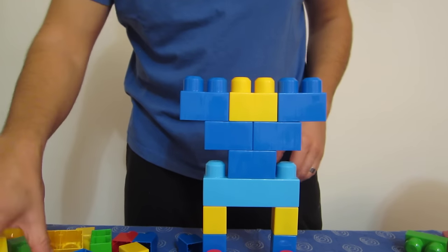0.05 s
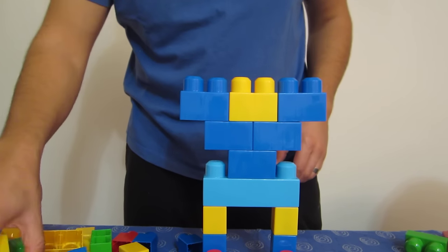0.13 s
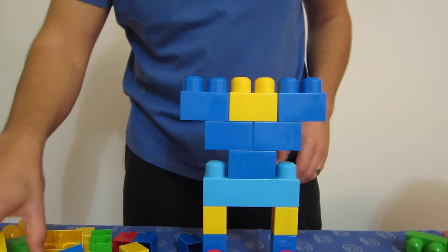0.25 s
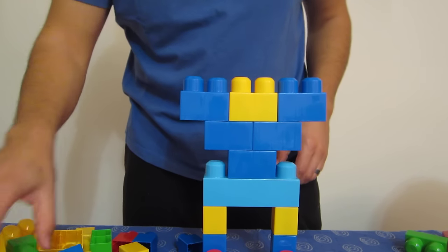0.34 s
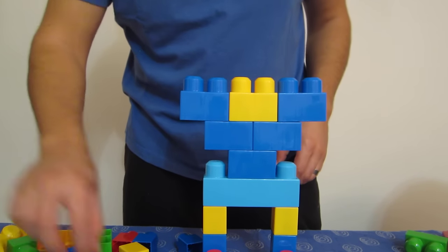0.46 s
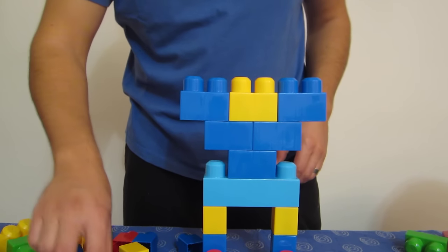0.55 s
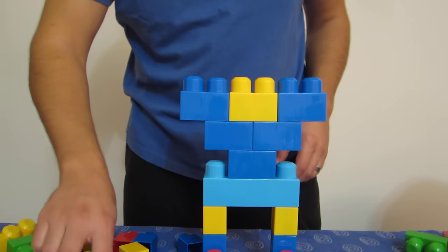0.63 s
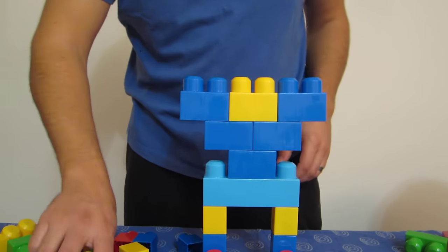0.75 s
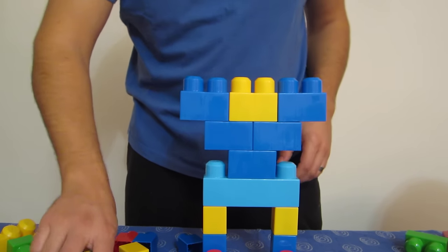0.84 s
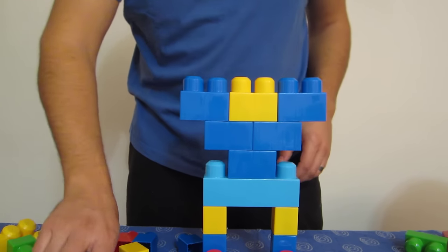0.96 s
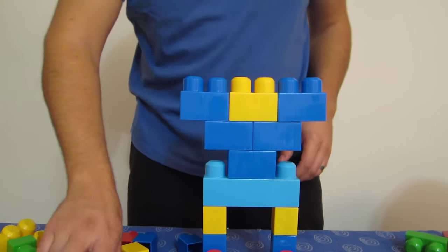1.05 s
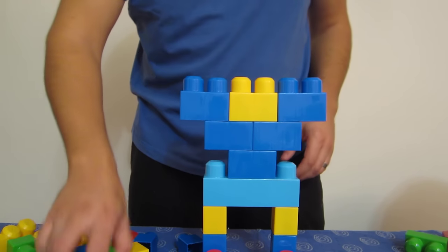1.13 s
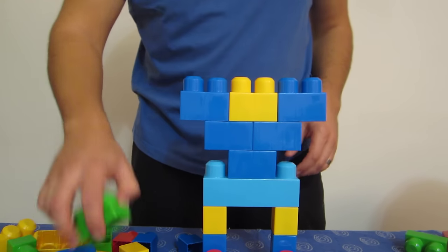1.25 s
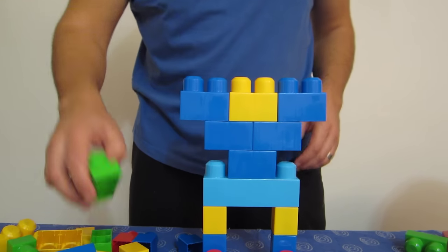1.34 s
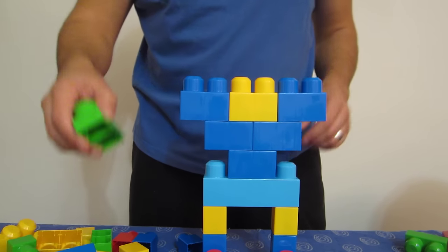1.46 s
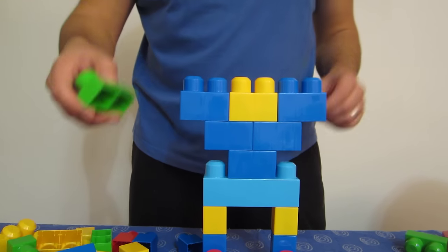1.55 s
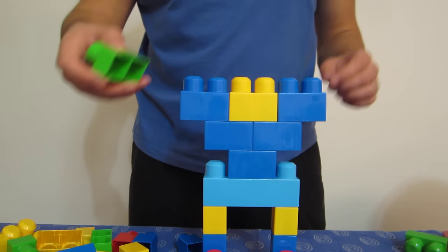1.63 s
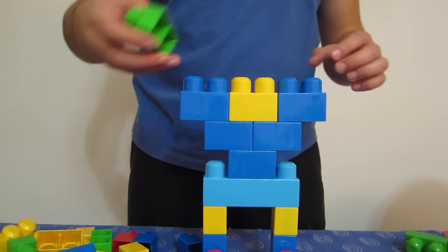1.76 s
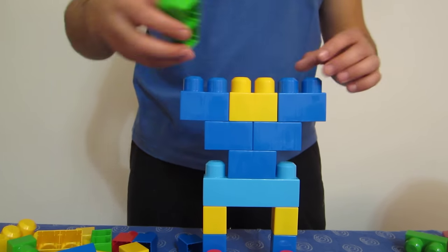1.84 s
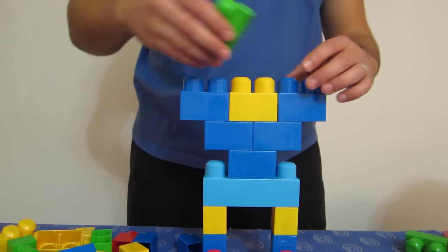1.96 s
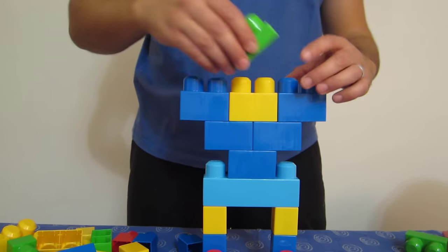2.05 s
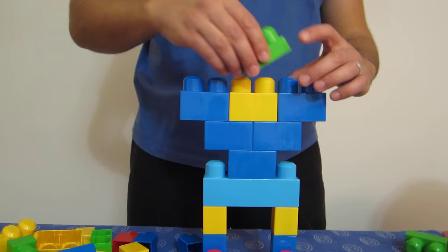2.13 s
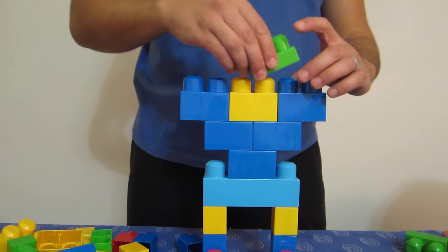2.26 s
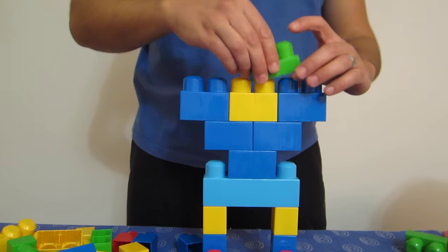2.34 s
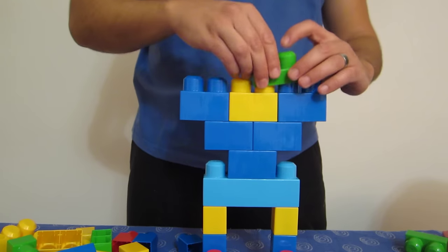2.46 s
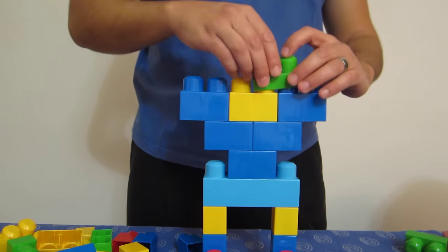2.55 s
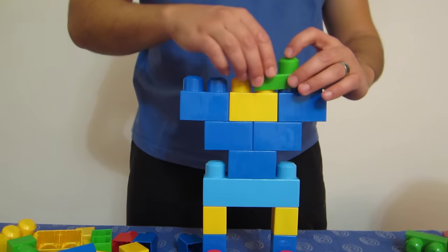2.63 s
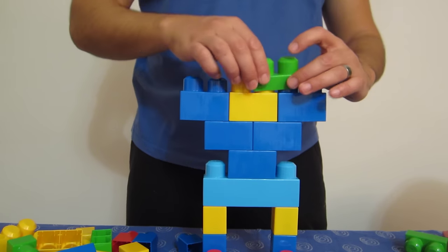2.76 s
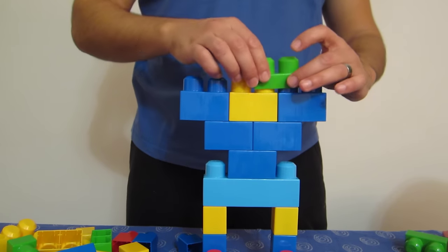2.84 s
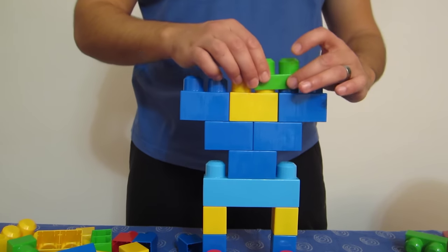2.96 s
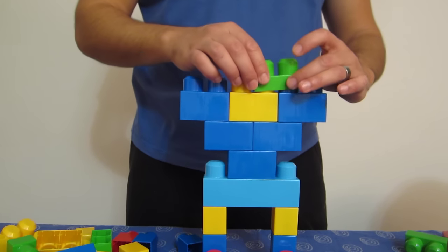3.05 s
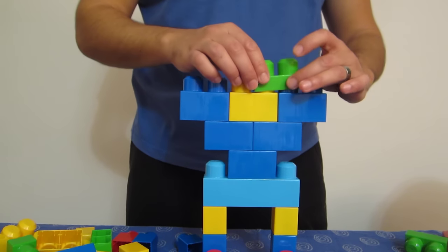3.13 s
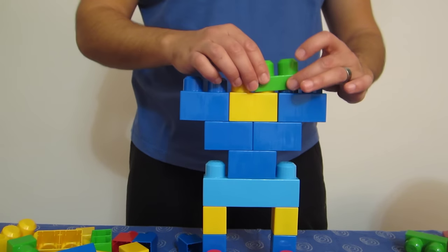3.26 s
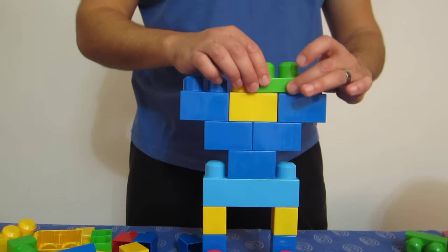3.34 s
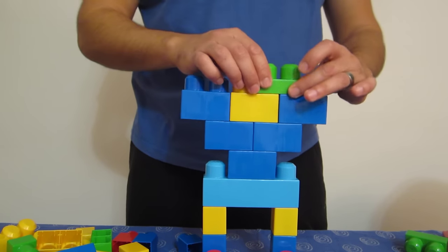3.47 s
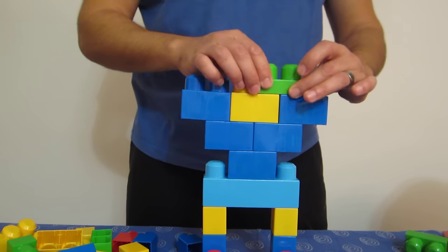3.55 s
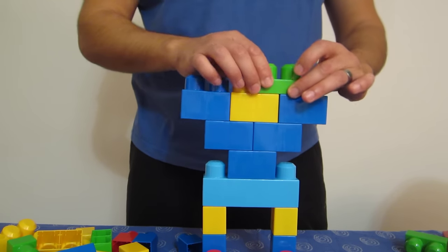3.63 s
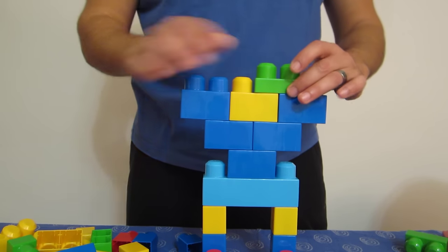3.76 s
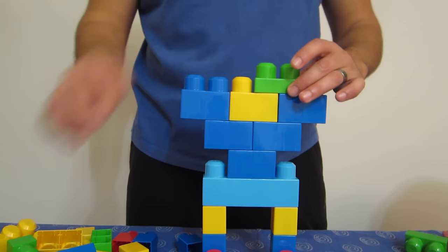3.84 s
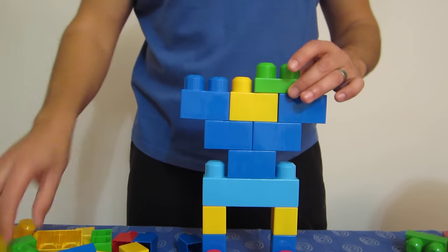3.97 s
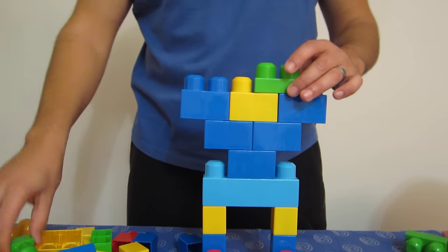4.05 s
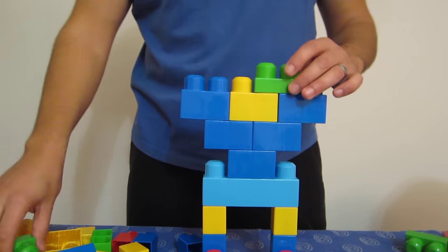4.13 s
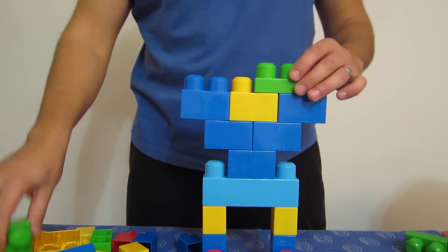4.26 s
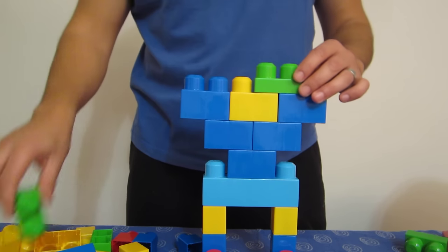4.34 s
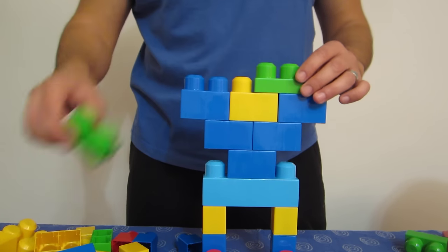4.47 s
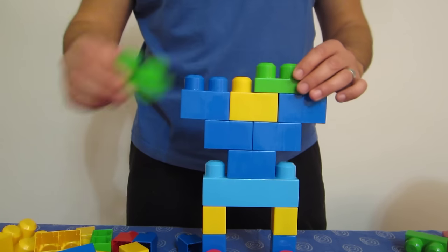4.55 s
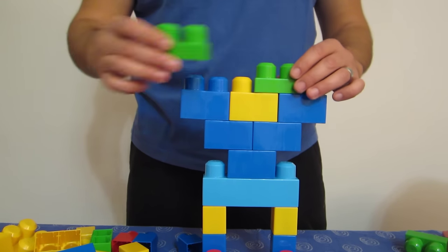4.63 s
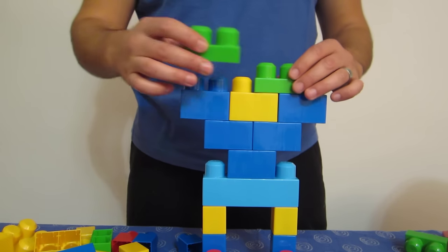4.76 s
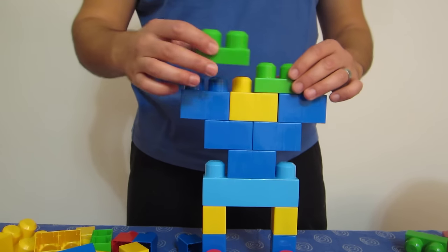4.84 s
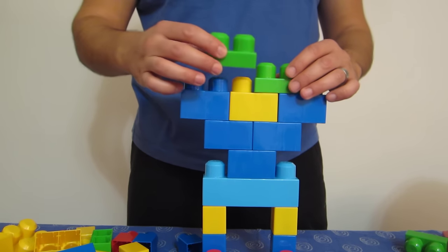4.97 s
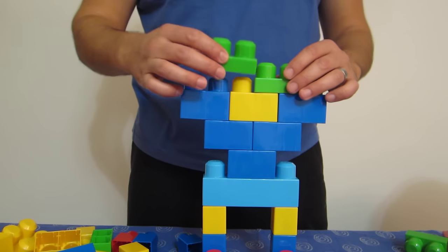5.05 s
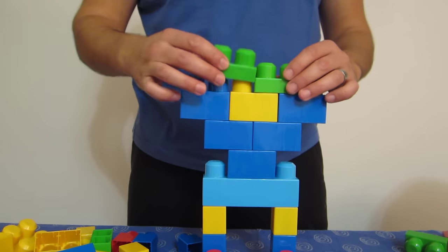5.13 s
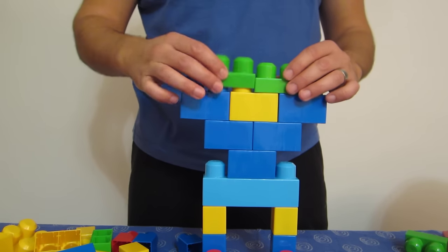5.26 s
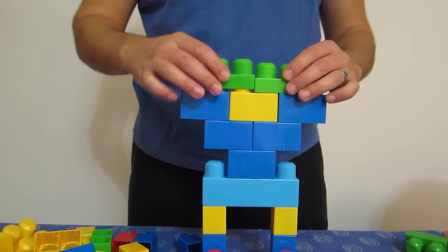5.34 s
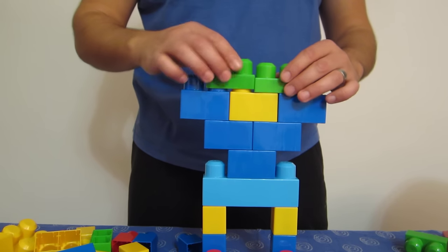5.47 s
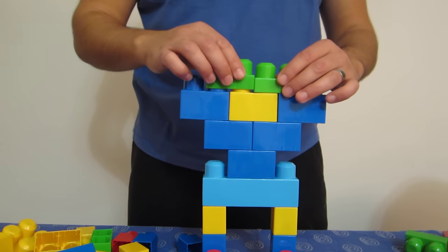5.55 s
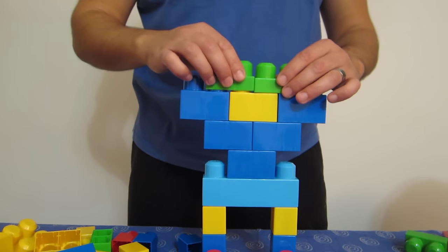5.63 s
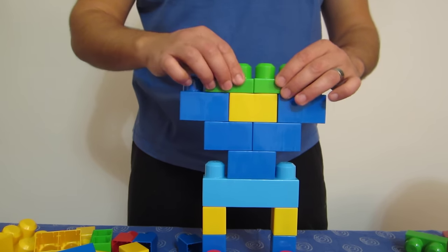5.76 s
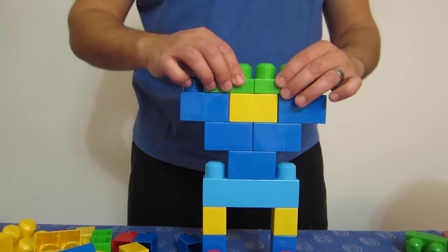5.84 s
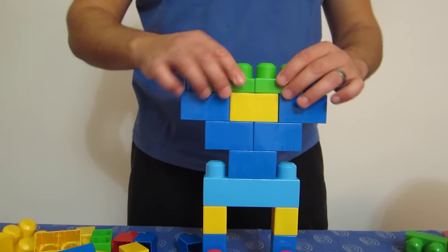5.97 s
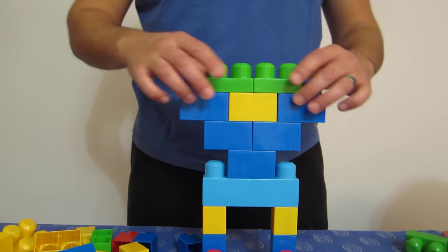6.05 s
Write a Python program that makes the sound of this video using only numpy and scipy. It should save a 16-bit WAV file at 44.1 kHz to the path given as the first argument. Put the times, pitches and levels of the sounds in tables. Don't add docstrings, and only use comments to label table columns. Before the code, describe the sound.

Close in a small indoor room, large hollow plastic blocks clatter and scrape as a hand searches a pile on a table. The rummaging fades after a second, with faint skin rubs. One block knocks sharply onto a stack and settles with tiny clicks. A shorter, lighter rummage follows, then a second block snaps on. Faint hum and microphone hiss continue underneath.

```python
import sys
import numpy as np
from scipy import signal
from scipy.fft import rfft, irfft
from scipy.io import wavfile
from scipy.ndimage import uniform_filter1d

SR = 44100
rng = np.random.default_rng(int(sys.argv[2]) if len(sys.argv) > 2 else 0)


def amplitude_ratio(level_db):
    exponent = np.asarray(level_db, float) / 20
    return 10 ** exponent


def to_wav(s):
    ch = np.atleast_2d(s).T
    pcm = np.round(np.clip(ch, -1, 1) * 32767)
    wavfile.write(sys.argv[1], SR, pcm.astype(np.int16))


N = 269010

# frequency in Hz, density in dB per Hz.
AIR_SPECTRUM = [(12, -19), (20, 1.5), (53, -3), (174, -2.5), (205, -8), (264, -5.5), (304, -8.5), (403, -9),
                (438, -12), (533, -11.5), (1050, -16.5), (1200, -14), (2110, -20.5), (7890, -25),
                (16400, -33.5)]
# frequency in Hz, width in Hz, level in dB.
HUM_LINES = [(183.5, 13, -70), (1186, 42, -72), (7840, 66, -79.5), (13100, 40, -113)]
# frequency in Hz, decay time t60 in seconds, level in dB.
ROOM_BANDS = [(358, 0.4, -24), (900, 0.38, -23), (2000, 0.21, -20.5), (3970, 0.46, -24.5),
              (8600, 0.25, -21), (12600, 0.096, -15)]
# frequency in Hz, level in dB, decay time t60 in seconds.
TABLE_MODES = [(83, 1.5, 0.1), (118.9, 0.5, 0.31), (164, -10, 0.31), (291, 5, 0.048)]
# start in seconds, peak level in dB.
TABLE_BLOWS = [(0.023, -36.5), (0.148, -49), (0.317, -39), (0.607, -24.5), (0.645, -23.5), (0.759, -35.5),
               (0.995, -42), (4.065, -39), (4.168, -49), (4.337, -40), (5.297, -44), (5.899, -39),
               (5.931, -35.5), (5.951, -41)]
# frequency in Hz, width in Hz, level in dB.
SKIN_RESONANCES = [(2210, 450, 6), (5900, 3000, -2.5), (7300, 2600, -2), (9600, 640, 4), (10750, 1700, -3)]
# loudest moment in seconds, level in dB, length in seconds.
FINGER_RUBS = [(1.315, -56, 0.15), (1.515, -57, 0.081), (1.58, -56.5, 0.15), (1.74, -63, 0.082),
               (1.795, -56, 0.067), (1.87, -64, 0.13), (2.37, -59, .1), (2.746, -61, .1), (3.686, -65, .2),
               (4.075, -52, 0.045), (4.12, -56, 0.16), (4.52, -57.5, 0.079), (4.605, -65, 0.12),
               (5.565, -60, .06), (5.64, -63, 0.075), (5.95, -57, 0.057), (6.0, -61, .08)]
# frequency in Hz, level in dB.
BLOCK_MODES = [(340, -22), (470, -11.5), (600, -8.5), (700, -4.5), (830, -6), (1050, -4.5), (1280, -3),
               (1450, -1.5), (1650, -5.5), (2000, 1.5), (2300, -9.5), (2700, -10), (3050, -7.5),
               (3500, -7.5), (4200, -5), (4800, -18), (5400, -9), (6100, -7)]
# frequency in Hz, width in Hz, level in dB.
EDGE_RESONANCES = [(7120, 1300, 14), (8760, 1900, 6), (12200, 1900, -1)]
# loudest moment in seconds, level in dB, length in seconds.
PILE_SCRAPES = [(.05, -41, 0.29), (.17, -49, 0.22), (.34, -33.5, 0.082), (.48, -54, .1), (.69, -36, 0.21),
                (.85, -52.5, 0.36), (1.03, -43.5, 0.21), (1.17, -61, 0.23), (2.47, -52.5, 0.17),
                (4.075, -45.5, 0.062), (4.2, -47, 0.28), (4.36, -43, .25), (4.47, -61, .15)]
# start in seconds, hollow note in Hz, hollow in dB, snap in dB.
END_WALL_KNOCKS = [(0.0002, 1140, -27.5, -41), (0.0196, 1230, -28, -51), (0.0266, 1163, -17, -21.5),
                   (0.0343, 1130, -36, -50), (0.3943, 1040, -29, -28), (0.4389, 670, -33, -48),
                   (0.5911, 960, -40, -36), (0.5971, 1150, -33, -44), (4.0917, 2170, -39, -36),
                   (4.1011, 1280, -41.5, -40), (4.1345, 1340, -40.5, -35), (2.4385, 1880, -27, -19.5),
                   (2.4461, 1920, -43, -44), (3.6304, 1480, -51, -49), (5.1772, 1790, -48, -25.5),
                   (6.0238, 1150, -51, -46)]
# start in seconds, hollow note in Hz, hollow in dB, snap in dB.
SIDE_WALL_KNOCKS = [(0.6354, 1600, -28, -57), (0.6471, 720, -20, -15.5), (0.6648, 1270, -21.5, -29),
                    (0.6971, 1230, -28.5, -30), (0.7385, 1260, -32, -21.5), (0.7595, 770, -20.5, -18.5),
                    (0.822, 1550, -22.5, -37), (0.8751, 700, -31.5, -45), (0.9481, 690, -32, -55),
                    (0.9982, 650, -22, -27), (1.0718, 640, -40, -57), (1.0775, 644, -35, -47),
                    (1.147, 1380, -36.5, -59), (0.1527, 2077, -17, -21.5), (0.2846, 1200, -31.5, -32),
                    (0.3235, 1077, -21, -15), (1.3143, 1270, -36, -50), (1.3737, 634, -40.5, -62),
                    (2.1544, 1310, -32.5, -42.5), (2.315, 1330, -46, -56), (2.708, 1270, -51.5, -44),
                    (2.927, 1310, -54, -62), (2.977, 1510, -52, -63), (3.366, 1310, -48.5, -58),
                    (3.849, 1440, -51, -58)]
# start in seconds, hollow note in Hz, hollow in dB, snap in dB.
LONG_WALL_KNOCKS = [(4.1736, 1860, -31, -31.5), (4.1781, 1980, -29, -46), (4.2413, 1220, -43, -55),
                    (1.1678, 1220, -32.5, -32.5), (0.1433, 740, -25.5, -25), (0.1486, 845, -24.5, -30),
                    (4.334, 620, -29.5, -31), (4.3392, 2480, -29, -19.5), (4.3662, 860, -31, -29.5),
                    (4.3846, 790, -41, -53), (4.4029, 660, -30, -31), (4.4402, 780, -37, -36),
                    (4.4447, 665, -38, -55), (4.4585, 825, -37, -57), (4.6359, 810, -39.5, -48),
                    (5.154, 1307, -27.5, -20), (5.3067, 1210, -37.5, -36.5), (5.434, 2000, -51, -55)]
# start in seconds, hollow note in Hz, hollow in dB, snap in dB.
FACE_MEETINGS = [(0.276, 750, -27.5, -30), (0.4451, 720, -32, -33), (0.5867, 1110, -47, -35),
                 (0.7552, 960, -23.5, -24), (0.9217, 756, -31.5, -42), (1.0241, 2120, -37, -33.5),
                 (2.1548, 1900, -41, -48), (2.439, 645, -35, -47), (4.2603, 2130, -34.5, -34.5),
                 (4.2957, 2250, -35, -31), (4.3039, 2240, -39, -42), (4.3273, 1210, -40, -41),
                 (4.3566, 670, -28, -35), (4.6301, 880, -42.5, -45.5), (5.1835, 1350, -34, -50),
                 (5.7488, 1200, -47, -43)]
# start in seconds, hollow note in Hz, hollow in dB, snap in dB.
CORNER_KNOCKS = [(0.1188, 820, -29, -33.5), (0.1661, 627, -31, -31), (0.2562, 1300, -29, -34),
                 (0.6106, 1120, -20, -22.5), (0.659, 1230, -19.5, -17), (0.9172, 1080, -26, -35.5),
                 (4.0704, 2150, -39, -40), (4.2539, 2300, -34, -48), (4.2798, 696, -33.5, -38.5),
                 (4.3445, 2240, -27, -31.5), (5.1582, 1380, -29.5, -34), (5.4433, 1970, -48, -52),
                 (5.7388, 1380, -45, -47), (3.7134, 1250, -52, -53.5)]
# start in seconds, hollow note in Hz, hollow in dB, snap in dB.
RIM_GRAZES = [(0.0589, 1250, -28, -48), (0.2799, 1340, -40, -47), (0.6547, 820, -22, -37),
              (0.6881, 2430, -27, -41), (0.7481, 894, -18.5, -47), (0.813, 900, -27, -56),
              (0.889, 2280, -32, -60), (1.0097, 750, -28, -46), (1.7319, 2230, -50.5, -61.5),
              (2.4641, 1860, -48, -62), (4.0634, 2300, -43.5, -53), (4.0837, 2060, -40, -58),
              (4.1468, 2040, -39, -61), (4.5838, 2060, -57, -55), (5.9002, 1910, -46, -55.5)]
# start in seconds, hollow note in Hz, hollow in dB, snap in dB.
STUD_CATCHES = [(0.1829, 1420, -26, -29.5), (0.4025, 834, -53, -37), (2.5219, 1500, -42, -40),
                (2.5498, 1390, -44, -45), (2.579, 1250, -60, -41), (2.5944, 1910, -44.5, -47.5),
                (3.68, 1340, -47, -43), (3.877, 1880, -46.5, -52), (4.4135, 680, -44, -42),
                (5.1703, 1840, -56, -22), (5.2539, 1820, -35, -23), (5.287, 1400, -35.5, -50),
                (5.302, 2070, -38.5, -42), (5.931, 1570, -44, -40), (5.949, 1900, -42.5, -42.5),
                (6.009, 1560, -42.5, -42)]


def scale_rms(x, db):
    return x * amplitude_ratio(db) / np.sqrt(np.mean(x ** 2))


def scale_peak(x, db):
    return x * amplitude_ratio(db) / np.abs(x).max()


def resonance(x, hz, width):
    return signal.lfilter(*signal.iirpeak(hz, hz / width, SR), x)


def decay(t, t60):
    return np.exp(-np.log(1000) * t / t60)


def ring(hz, t60, t):
    return np.sin(2 * np.pi * hz * t) * decay(t, t60)


def onset(t, seconds):
    return 1 - np.exp(-t / seconds)


def add(out, s, sound):
    i = int(s * SR)
    out[i:i + len(sound)] += sound[:N - i]


def strokes(rows):
    rise_share, fade_db = 0.39, 19
    t, gain = np.arange(N) / SR, np.zeros(N)
    for s, db, length in rows:
        near = slice(max(int((s - 2 * length) * SR), 0), int((s + 2 * length) * SR))
        late = (t[near] - s) / length
        distance = np.where(late < 0, -late / rise_share, late / (1 - rise_share))
        gain[near] += amplitude_ratio(db - fade_db * distance)
    return gain


def air():
    hz, db = np.transpose(AIR_SPECTRUM)
    bin_hz = np.arange(N // 2 + 1) * SR / N
    colour = amplitude_ratio(np.interp(np.log(bin_hz + 1), np.log(hz), db))
    tone = scale_rms(irfft(rfft(rng.standard_normal(N)) * colour, N), -57.5)
    for hz, width, db in HUM_LINES:
        tone = tone + scale_rms(resonance(rng.standard_normal(N), hz, width), db)
    return tone


def room(x):
    gap_s, build_s = 0.0032, 0.00087
    t = np.arange(SR // 2) / SR
    tail = np.zeros(len(t))
    for hz, t60, db in ROOM_BANDS:
        part = resonance(rng.standard_normal(len(t)), hz, 0.77 * hz) * decay(t, t60)
        tail += amplitude_ratio(db + 5.5) * part / np.sqrt(np.sum(part ** 2))
    tail *= onset(np.maximum(t - gap_s, 0), build_s)
    return signal.fftconvolve(x, tail)[:N]


def table():
    t, out = np.arange(12000) / SR, np.zeros(N)
    boom = sum(amplitude_ratio(db) * ring(hz, t60, t) for hz, db, t60 in TABLE_MODES) * onset(t, 0.0084)
    for s, db in TABLE_BLOWS:
        add(out, s, amplitude_ratio(db - 7.5) * boom)
    return out


def fingers():
    grain = rng.standard_normal(N)
    unevenness_db = 20 * uniform_filter1d(rng.standard_normal(N), size=100)
    grain *= amplitude_ratio(unevenness_db)
    hiss = np.zeros(N)
    for hz, width, db in SKIN_RESONANCES:
        hiss += amplitude_ratio(db) * resonance(resonance(grain, hz, width), hz, 2 * width)
    return scale_rms(hiss, 0) * strokes(FINGER_RUBS)


def pile():
    slips_per_s, spread_db, treble_db = 3500, 1.5, -12
    slips = (rng.random(N) < slips_per_s / SR) * rng.standard_normal(N)
    slips *= amplitude_ratio(spread_db * rng.exponential(size=N))
    dull, bright = np.zeros(N), np.zeros(N)
    for hz, db in BLOCK_MODES:
        tilt_db = -4 * np.abs(np.log2(hz / 1200))
        dull += amplitude_ratio(db + tilt_db) * resonance(slips, hz, 0.12 * hz)
    for hz, width, db in EDGE_RESONANCES:
        bright += amplitude_ratio(db) * resonance(slips, hz, width)
    return strokes(PILE_SCRAPES) * (scale_rms(dull, -5) + amplitude_ratio(treble_db) * scale_rms(bright, -38))


def contacts():
    # contacts, wall note in Hz, edge tick over snap in dB
    kinds = [(END_WALL_KNOCKS, 4000, -10), (SIDE_WALL_KNOCKS, 3155, -10), (LONG_WALL_KNOCKS, 2550, -10),
             (FACE_MEETINGS, 3070, -13), (CORNER_KNOCKS, 2980, 0.5), (RIM_GRAZES, 2700, 12.3),
             (STUD_CATCHES, 5540, -2.5)]
    return [(s, hollow_hz, hollow_db, wall_hz, snap_db, snap_db + edge_db)
            for rows, wall_hz, edge_db in kinds for s, hollow_hz, hollow_db, snap_db in rows]


def edge_ticks(count, t, push_s):
    grit = rng.standard_normal((count, len(t))) * decay(t, 0.014) * onset(t, push_s)
    coloured = sum(amplitude_ratio(db) * resonance(grit, hz, width) for hz, width, db in EDGE_RESONANCES)
    return resonance(coloured, 10250, 5600)


def chatter(count):
    t = np.arange(400) / SR
    rebounds = rng.standard_normal((count, 400)) * (rng.random((count, 400)) < 0.06)
    return amplitude_ratio(-12) * rebounds * np.exp(-t / 0.004) + (t == 0)


def blocks():
    hollow_t60, wall_t60, shared_t60, push_s = 0.015, 0.0045, 0.016, 0.0002
    shared_db, scatter_db, detuning = -3, 3, 0.066
    t, out, hits = np.arange(2000) / SR, np.zeros(N), contacts()
    shared_hz, weight_db = np.transpose(BLOCK_MODES)
    low = shared_hz < 2400
    chances = rng.standard_normal((len(hits), 3, len(shared_hz)))
    ticks = edge_ticks(len(hits), t, push_s)
    touches = chatter(len(hits))
    for hit, chance, tick, touch in zip(hits, chances, ticks, touches):
        s, hollow_hz, hollow_db, wall_hz, wall_db, edge_db = hit
        detune, size, side = chance
        hz = shared_hz * (1 + detuning * detune)
        octaves_off = np.abs(np.log2(hz / np.where(low, hollow_hz, wall_hz)))
        mode_db = weight_db + shared_db + scatter_db * size - np.where(low, 4, 2) * octaves_off
        strength = np.sign(side) * amplitude_ratio(mode_db)
        mode_t60 = shared_t60 * np.sqrt(1000 / hz)
        modes = strength[:, None] * ring(hz[:, None], mode_t60[:, None], t)
        hollow = (ring(hollow_hz, hollow_t60, t) + modes[low].sum(axis=0)) * onset(t, push_s)
        wall = (ring(wall_hz, wall_t60, t) + modes[~low].sum(axis=0)) * onset(t, push_s / 3)
        add(out, s, scale_peak(np.sign(size[0]) * signal.fftconvolve(hollow, touch), hollow_db + 3))
        add(out, s, scale_peak(np.sign(size[1]) * signal.fftconvolve(wall, touch), wall_db + 2))
        add(out, s, scale_peak(tick, edge_db + 1.5))
    return out


def scene():
    bass_cut = signal.butter(2, 300, "high", fs=SR, output="sos")
    near = signal.sosfilt(bass_cut, blocks() + pile()) + fingers()
    return (near + room(near) + table() + air())[None]


def top_cut(x):
    return signal.sosfilt(signal.butter(12, 16510, fs=SR, output="sos"), x)


def record(dry):
    top = signal.cheby2(10, 45, 16260, fs=SR, output="sos")
    mic = signal.sosfilt(top, dry)
    return top_cut(mic)


dry = scene()
out = record(dry)
to_wav(out)
```